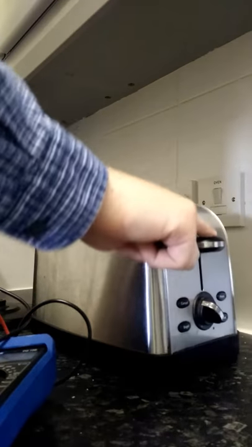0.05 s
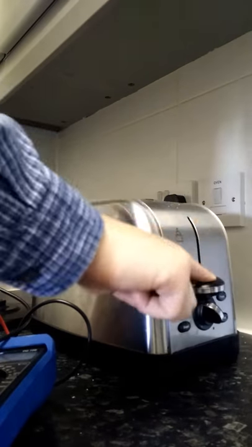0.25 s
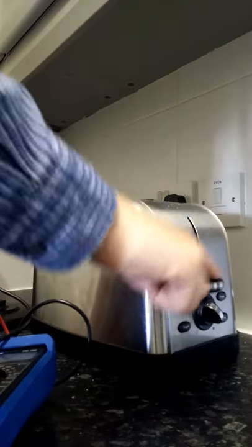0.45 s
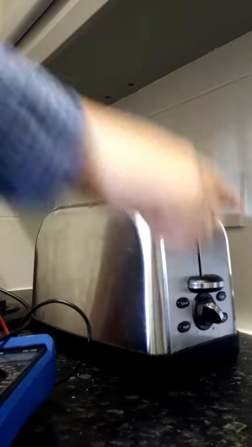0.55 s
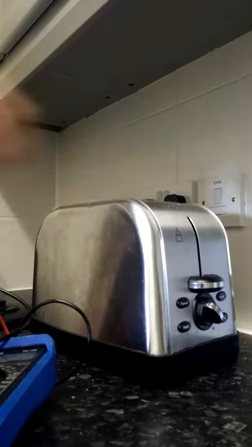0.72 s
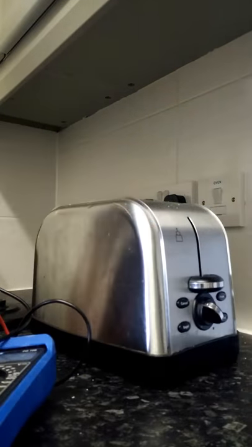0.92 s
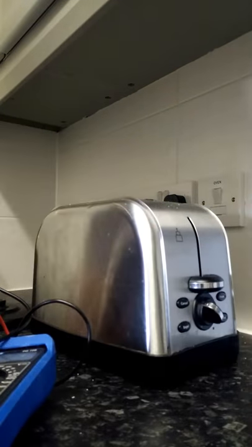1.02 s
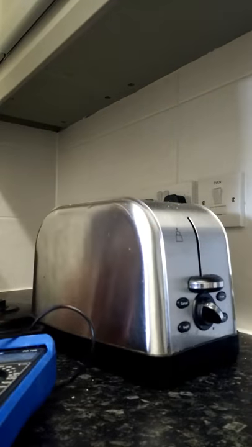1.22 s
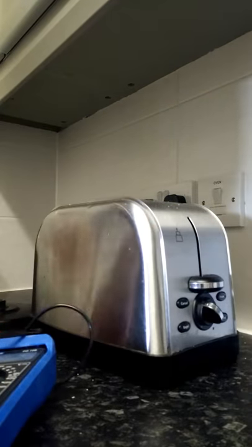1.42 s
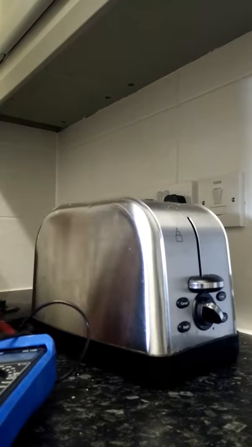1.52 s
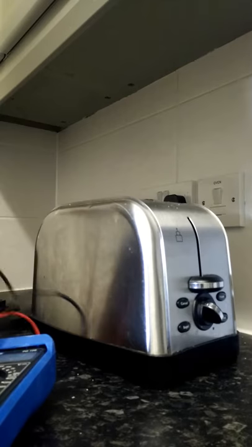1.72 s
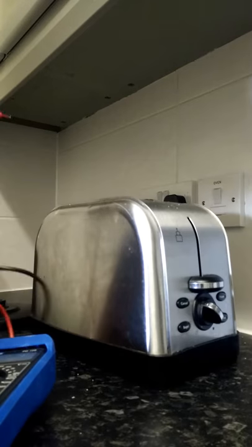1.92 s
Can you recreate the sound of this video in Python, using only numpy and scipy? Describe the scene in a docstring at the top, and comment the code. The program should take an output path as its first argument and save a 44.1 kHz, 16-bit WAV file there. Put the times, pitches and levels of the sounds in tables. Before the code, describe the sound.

Close up in a quiet tiled kitchen, a toaster lever is pressed down with a metallic clunk and a duller knock. A sharp plastic click follows slightly to the left, with soft bumps, ticks and faint rubbing.

```python
"""A steel toaster's lever is pushed down in a quiet tiled kitchen: the carriage rattles down its rail,
latches with a clunk and knocks back as the finger lets go. Each impact excites damped modes of the casing
and a dense ring of thin steel and room. On the left a plastic meter is then shifted on the worktop, with
hollow bumps, a sharp snap, small ticks and tapping leads. Sleeve and leads rub by friction; a faint
mains hum and room hiss lie underneath."""
import sys
import numpy as np
from scipy import signal
from scipy.io import wavfile

SR = 44100
rng = np.random.default_rng(int(sys.argv[2]) if len(sys.argv) > 2 else 0)


def file_out(sig):
    """Save sig as 16-bit WAV at sys.argv[1]."""
    # one column per channel
    cols = np.atleast_2d(sig).T
    # limit, then scale
    lim = np.clip(cols, -1, 1)
    pcm = np.round(lim * 32767).astype(np.int16)
    wavfile.write(sys.argv[1], SR, pcm)


N = 85995
TIME = np.arange(N) / SR


def amp(db):
    """The decibel law: 20 dB is a tenfold amplitude."""
    return 10 ** (np.asarray(db, float) / 20)


def balance(db):
    """Level-difference panning: two gains, the left db above the right."""
    return amp([[db / 2], [-db / 2]])


def unit_rms(x):
    """Normalisation to unit mean power."""
    return x / np.sqrt(np.mean(x ** 2) + 1e-20)


def at_hz(points, hz):
    """Interpolation over log frequency; the end values hold outside."""
    freqs, values = np.transpose(points)
    return np.interp(np.log(hz), np.log(freqs), values)


def strikes(starts, db):
    """Brief impacts idealised as one impulse each."""
    out = np.full(N, 1e-18)
    np.add.at(out, (np.asarray(starts) * SR).astype(int), amp(db))
    return out


def grains(per_s, spread_db):
    """Shot noise: random impulses of uneven size, at rms 1."""
    size = amp(spread_db * np.minimum(rng.exponential(1, N), 4)) * rng.choice([-1, 1], N)
    return unit_rms(size * (rng.random(N) < per_s / SR))


def ring(x, hz, t60):
    """A damped harmonic oscillator, falling 60 dB in t60 seconds."""
    r, w = amp(-60 / (t60 * SR)), 2 * np.pi * hz / SR
    return signal.lfilter([0, np.sin(w)], [1, -2 * r * np.cos(w), r * r], x)


def soften(x, hz):
    """A two-pole low-pass, as in a compliant contact."""
    r = np.exp(-2 * np.pi * hz / SR)
    return signal.lfilter([(1 - r) ** 2], [1, -2 * r, r * r], x)


# Likeness of left and right. Each row: frequency in Hz, correlation from 0 to 1.
COHERENCE = [(60, 1), (180, 0.23), (550, 0.91), (1650, 0.018), (4970, 0.017), (15000, 0.0069)]

def bands(white, spectrum, sides, envelope=lambda hz: 1):
    """A partly coherent field: third-octave noise bands, total rms near 1 before the envelope."""
    bottom, top = spectrum[0][0], spectrum[-1][0]
    edges = np.geomspace(bottom, top, int(3 * np.log2(top / bottom)) + 1)
    out, power = 0, 0
    for k, (low, high) in enumerate(zip(edges, edges[1:])):
        bandpass = signal.butter(2, [low, high], "band", fs=SR, output="sos")
        mid, side = signal.sosfilt(bandpass, white[k % 2])
        hz = np.sqrt(low * high)
        alike, gain = at_hz(COHERENCE, hz), amp(at_hz(spectrum, hz))
        pair = np.sqrt(1 + alike) * mid + np.sqrt(1 - alike) * side * [[1], [-1]]
        out += gain * balance(at_hz(sides, hz)) * envelope(hz) * pair
        power += gain ** 2 * 2 * (high - low) / (SR / 2)
    return out / np.sqrt(power)


def dense_ring(hits, spectrum, sides, t60s, early, tail_db):
    """Overlapping modes act as decaying noise: early parts (dB, t60 in seconds), then a tail per band."""
    def energy(db, t60):
        return amp(2 * db) * signal.lfilter([1], [1, -amp(-120 / (t60 * SR))], hits ** 2 + 1e-18)
    crack = sum(energy(db, t60) for db, t60 in early)
    white = rng.standard_normal((2, 2, N))
    return bands(white, spectrum, sides, lambda hz: np.sqrt(crack + energy(tail_db, at_hz(t60s, hz))))


# Room noise. Each row: frequency in Hz, relative density in dB.
ROOM_SPECTRUM = [(35, 10.5), (100, -10), (200, -13.5), (450, -19), (900, -27), (2000, -20.5), (4500, -24),
                 (7000, -19), (9500, -32.5), (15500, -28.5)]
# Its balance. Each row: frequency in Hz, left minus right in dB.
ROOM_SIDES = [(100, -9.5), (200, 1), (1300, 2.5), (4400, 0), (8000, -10.5), (15000, -1.5)]

def room_hiss():
    """Stationary broadband noise, strongest in the bass."""
    white = rng.standard_normal((2, 2, N + SR // 2))
    return amp(-60.5) * unit_rms(bands(white, ROOM_SPECTRUM, ROOM_SIDES)[:, -N:])


# Hum partials. Each row: frequency in Hz, rms level in dB.
HUM_PARTIALS = [(100, -68.5)]

def mains_hum():
    """A tone at twice the mains frequency, with slow random amplitude modulation."""
    waver_db = 2.0 * unit_rms(soften(rng.standard_normal(N + SR), hz=11)[-N:])
    tone = sum(np.sqrt(2) * amp(db) * np.sin(2 * np.pi * hz * TIME) for hz, db in HUM_PARTIALS)
    return amp(waver_db) * tone


# Course of the rubbing. Each row: time in seconds, low part in dB, bright part in dB.
RUB_LEVELS = [(0, -45.5, -54), (.04, -59.5, -61), (.1, -67, -71.5), (0.204, -58, -55.5),
              (0.631, -65, -67.5), (0.791, -69, -82.5), (1.05, -71, -62), (1.12, -58, -65),
              (1.27, -52.5, -54), (1.33, -57, -83), (1.429, -52, -56.5), (1.474, -62.5, -74),
              (1.589, -63.5, -62.5), (1.631, -73, -93), (1.77, -76.5, -79), (1.78, -65, -74),
              (1.856, -67.5, -69), (1.95, -71, -70)]
# Spectra of the two parts. Each row: frequency in Hz, relative density in dB.
RUB_LOW = [(120, 1), (236, -4), (400, -0.5), (850, -4), (1500, -20.5)]
RUB_BRIGHT = [(1000, -7), (2000, -5.5), (4000, -5.5), (7000, -7.5), (15500, -33.5)]

def rubbing():
    """Friction of sleeve and leads: many tiny slips merge into noise."""
    times, low_db, bright_db = np.transpose(RUB_LEVELS)
    slips = np.array([[grains(per_s=2500, spread_db=3.2) for _ in range(2)] for _ in range(2)])
    return sum(amp(np.interp(TIME, times, db)) * unit_rms(bands(slips, spectrum, ROOM_SIDES))
               for db, spectrum in ((low_db, RUB_LOW), (bright_db, RUB_BRIGHT)))


# Lever parts. Each row: start in seconds, peak in dB, frequency in Hz, t60 in seconds.
LEVER_TICKS = [(0.2185, -27, 5000, 0.017), (0.4802, -34, 883, .025), (0.4958, -33.5, 1840, 0.03),
               (.533, -46, 647, 0.27)]

def lever_ticks():
    """Free vibration: each struck part rings in a single mode."""
    return sum(ring(strikes([start], [db]), hz, t60) for start, db, hz, t60 in LEVER_TICKS)


# Balance of the toaster. Each row: frequency in Hz, left minus right in dB.
STEEL_SIDES = [(60, -1), (110, -8), (200, 7), (380, 0), (700, 2.5), (1290, 1), (2380, 3), (4400, 1),
               (8120, -11.5), (15000, -8.5)]

def steel_modes(force, modes):
    """Modal superposition: one force drives all the modes, in alternating polarity."""
    return sum((-1) ** k * amp(db) * balance(at_hz(STEEL_SIDES, hz)) * ring(force, hz, t60)
               for k, (hz, db, t60) in enumerate(modes))


# Metal blows, and the course of the rattle. Each row: time in seconds, strength in dB.
BLOWS = [(0.2187, -30), (0.2651, -24.5), (0.271, -41), (0.2723, -18.5), (0.2751, -18.5), (.279, -21),
         (0.292, -25.5)]
RATTLE_LEVELS = [(0.2195, -63), (.226, -51), (0.242, -52), (.26, -58.5), (0.269, -50)]
# Casing modes. Each row: frequency in Hz, gain in dB, t60 in seconds.
CASING_MODES = [(148.2, -6.5, 0.22), (198.2, -8, 0.34), (317.5, -6, 0.1), (366, -20.5, 0.5),
                (448.7, -14.5, 0.25), (660.5, -11.5, 0.23), (705.6, -16, 0.22), (823, -7.5, 0.085),
                (1355, -19, 0.27), (1497, -12.5, 0.12), (1895, -11, 0.16)]
# Dense ring of thin steel and tiled room. Each row: frequency in Hz, relative density in dB.
STEEL_SPECTRUM = [(100, 1.5), (300, -1), (800, -7.5), (1100, -10), (2400, -10), (3000, -4.5), (3900, -7),
                  (4700, -7), (7000, -5), (9500, -18), (15500, -20)]
# Its tail. Each row: frequency in Hz, t60 in seconds.
STEEL_DECAY = [(80, 0.2), (300, 0.74), (1000, 0.58), (2400, 0.6), (3300, 0.72), (7000, 0.68), (15000, 0.58)]
# Its early parts. Each row: level relative to the blow in dB, t60 in seconds.
STEEL_EARLY = [(-7, 0.21), (-2, 0.032)]

def carriage():
    """Impact excitation: blows and the rattle down the rail set the casing ringing."""
    times, db = np.transpose(RATTLE_LEVELS)
    sliding = (TIME > times[0]) & (TIME < times[-1])
    rattle = grains(per_s=2800, spread_db=3) * amp(np.interp(TIME, times, db)) * sliding
    blows = strikes(*np.transpose(BLOWS))
    casing = amp(-9) * steel_modes(blows + amp(-6.5) * rattle, CASING_MODES)
    clash = dense_ring(blows + rattle, STEEL_SPECTRUM, STEEL_SIDES, STEEL_DECAY, STEEL_EARLY, tail_db=-18.5)
    return casing + clash


# The base presses on the worktop. Each row: start in seconds, strength in dB.
THUDS = [(0.221, -36.5), (0.266, -20.5), (0.496, -38.5)]

def base_thuds():
    """A compliant contact drives one low mode, louder on the right."""
    force = soften(strikes(*np.transpose(THUDS)), hz=83)
    return ring(force, hz=102, t60=0.17) * amp([[4], [8]])


# The catch closes and bounces. Each row: start in seconds, strength in dB.
LATCH_HITS = [(.2716, -16.5), (0.2785, -29), (0.288, -27)]
# Latch modes. Each row: frequency in Hz, gain in dB, t60 in seconds.
LATCH_MODES = [(3070, 3, 0.013), (4670, -0.5, 0.021), (5750, -3, 0.034), (6944, -15.5, 0.2)]
# Modes of the steel shell. Each entry: frequency in Hz.
SHELL_HZ = [2916, 2911, 3166, 2947, 3096, 3320, 3184]

def latch(shell_db=-26, shell_t60=0.4):
    """Hard contact excites high modes; those of the shell lie close together and beat."""
    shell = [(hz, shell_db, shell_t60) for hz in SHELL_HZ]
    return steel_modes(strikes(*np.transpose(LATCH_HITS)), LATCH_MODES + shell)


# Knocks as the finger lets go. Each row: start in seconds, strength in dB.
KNOCKS = [(0.4802, -43.5), (0.494, -36), (0.4978, -34), (.508, -39.5), (0.541, -49.5)]
# Their dense ring. Each row: frequency in Hz, relative density in dB.
KNOCK_SPECTRUM = [(95, -11), (200, -4), (650, -7), (1000, -15), (1500, -9), (2600, -18), (7000, -17),
                  (15500, -38.5)]
# Its tail. Each row: frequency in Hz, t60 in seconds.
KNOCK_DECAY = [(100, 1), (600, 0.39), (2000, 0.46), (7000, 0.3), (15000, 0.52)]
# Its early part. Each row: relative level in dB, t60 in seconds.
KNOCK_EARLY = [(0.0, 0.12)]

def release_knocks():
    """A softer contact carries less treble, so the same casing sounds duller."""
    hits = strikes(*np.transpose(KNOCKS))
    casing = amp(3) * steel_modes(soften(hits, hz=1450), CASING_MODES)
    return casing + dense_ring(hits, KNOCK_SPECTRUM, STEEL_SIDES, KNOCK_DECAY, KNOCK_EARLY, tail_db=-10.5)


# The meter bumps. Each row: start in seconds, strength in dB, left minus right in dB.
BUMPS = [(1.063, -38.5, 10.5), (1.142, -38, 13.5), (1.221, -53.5, 15), (1.252, -56.5, 27), (1.288, -50, 17),
         (1.34, -38, 13.5), (1.418, -50, 17.5), (1.517, -56, 18)]
# Worktop modes. Each row: frequency in Hz, gain in dB, t60 in seconds.
WORKTOP_MODES = [(101, -6.5, 0.14), (186.3, 1.5, 0.19), (235.2, 5.5, 0.13), (450, -4, 0.15),
                 (704, 2.5, 0.039)]

def meter_bumps():
    """Plate resonance: soft impacts ring the worktop's low, hollow modes."""
    starts, db, side_db = np.transpose(BUMPS)
    hits = np.array([strikes(starts, db + side_db / 2), strikes(starts, db - side_db / 2)])
    force = soften(hits, hz=304)
    return sum((-1) ** k * amp(db) * ring(force, hz, t60) for k, (hz, db, t60) in enumerate(WORKTOP_MODES))


# Snaps and ticks. Each row: start in seconds, strength in dB, pitch in Hz, case drive in dB.
SNAPS = [(1.1352, -41, 2370, -71), (1.1405, -21, 5260, -24.5), (1.142, -20.5, 5400, -22),
         (1.2591, -31.5, 5860, -47), (1.345, -43.5, 5650, -72), (1.4184, -44, 2090, -75),
         (1.516, -49, 2700, -68), (1.5903, -47, 1740, -54.5), (1.7756, -55.5, 2460, -71.5)]
# Modes of the meter's case. Each row: frequency in Hz, gain in dB, t60 in seconds.
METER_MODES = [(1130, -11.5, 0.02), (2480, -3.5, 0.012), (3473, -6.5, 0.02), (6500, -13, 0.013)]
# Dense ring of the plastic. Each row: frequency in Hz, relative density in dB.
SNAP_SPECTRUM = [(200, -30), (500, 1), (800, -3), (1600, -6), (2500, -0.5), (4500, -9.5), (7000, -3),
                 (9500, -29.5), (15500, -24.5)]
# Its balance. Each row: frequency in Hz, left minus right in dB.
SNAP_SIDES = [(200, -13.5), (700, 5), (2400, 0), (4400, 8.5), (8000, -14), (15000, 2)]
# Its tail. Each row: frequency in Hz, t60 in seconds.
SNAP_DECAY = [(300, 0.11), (1500, 0.34), (15000, 0.29)]
# Its early part. Each row: relative level in dB, t60 in seconds.
SNAP_EARLY = [(0.0, 0.033)]
METER_LEFT_DB = 7

def meter_snaps():
    """Heavy damping: the plastic's modes die quickly under a broadband crack and its tail."""
    starts, snap_db, _, drive_db = np.transpose(SNAPS)
    case = sum(ring(strikes(starts, drive_db + db), hz, t60) for hz, db, t60 in METER_MODES)
    pings = amp(-4) * sum(ring(strikes([start], [db]), hz, t60=0.0055) for start, db, hz, _ in SNAPS)
    hits = strikes(starts, snap_db)
    crack = dense_ring(hits, SNAP_SPECTRUM, SNAP_SIDES, SNAP_DECAY, SNAP_EARLY, tail_db=-9.5)
    return amp(-8.5) * crack + (case + pings) * balance(METER_LEFT_DB)


# Taps of the leads. Each row: start in seconds, strength in dB, frequency in Hz.
LEAD_TAPS = [(1.4186, -38, 830), (1.7771, -48.5, 383), (1.852, -51.5, 403)]

def lead_taps():
    """Each dull tap is the impulse response of one well-damped mode."""
    taps = sum(ring(strikes([start], [db]), hz, t60=0.027) for start, db, hz in LEAD_TAPS)
    return taps * balance(METER_LEFT_DB)


# A faint hiss at the end. Each row: start in seconds, centre in Hz, nominal width in Hz, level in dB.
NARROW_BANDS = [(1.892, 3940, 251, -65), (1.915, 3580, 200, -66.5)]

def narrow_hiss(rise_s=0.0026):
    """Resonant filtering: two resonators in series confine noise to a narrow band."""
    out = 0
    for start, hz, width, db in NARROW_BANDS:
        band = ring(ring(rng.standard_normal(N), hz, 1.5 / width), hz, 2.2 / width)
        out += amp(db) * unit_rms(band) * np.clip((TIME - start) / rise_s, 0, 1)
    return out * balance(-5)


def scene():
    """Linear superposition: the pressures of all sources add."""
    toaster = lever_ticks() + carriage() + base_thuds() + latch() + release_knocks()
    meter = meter_bumps() + meter_snaps() + lead_taps()
    return toaster + meter + rubbing() + room_hiss() + mains_hum() + narrow_hiss()


def record(dry, low_hz=75, stop_hz=16590):
    """Band limiting: small microphones lose the deep bass, and the top is cut steeply."""
    thin = signal.sosfilt(signal.butter(5, low_hz, "high", fs=SR, output="sos"), dry)
    return signal.sosfilt(signal.cheby2(12, 60, stop_hz, fs=SR, output="sos"), thin)


dry = scene()
out = record(dry)
file_out(out)
```